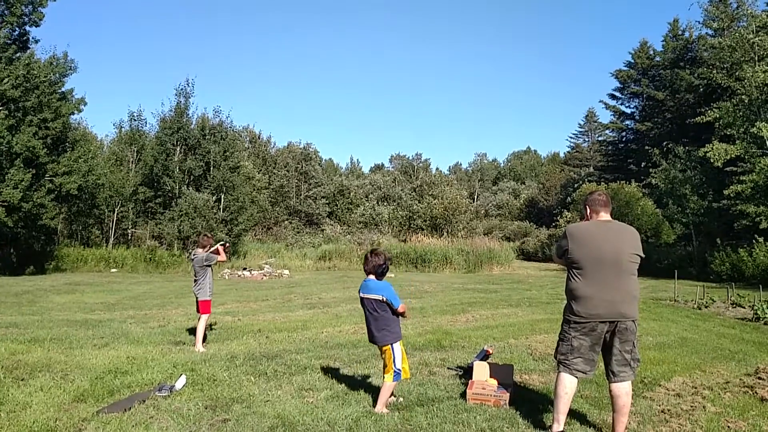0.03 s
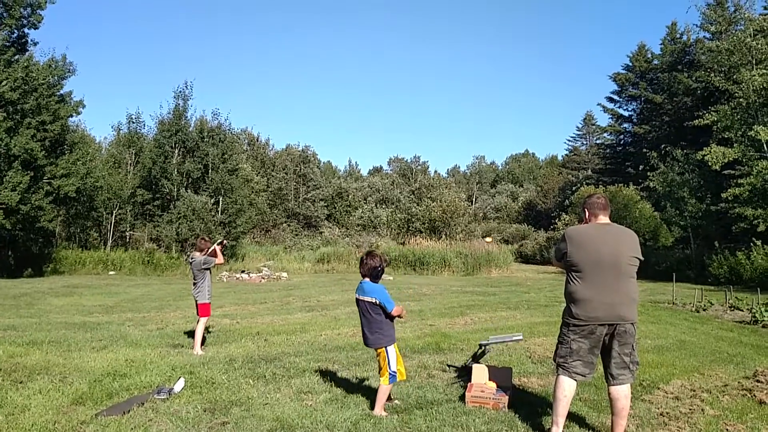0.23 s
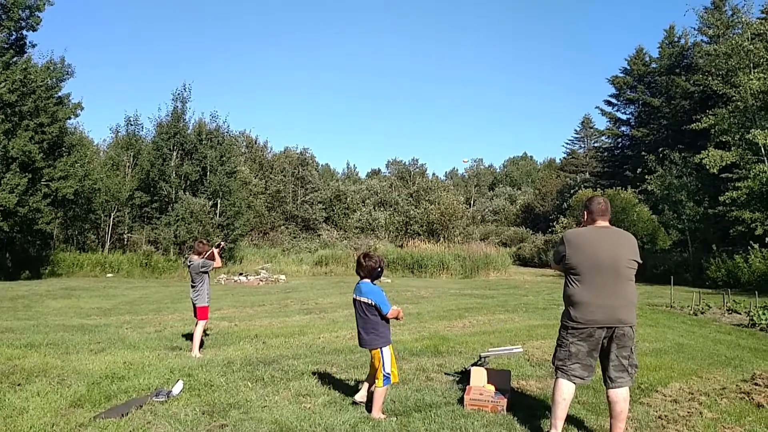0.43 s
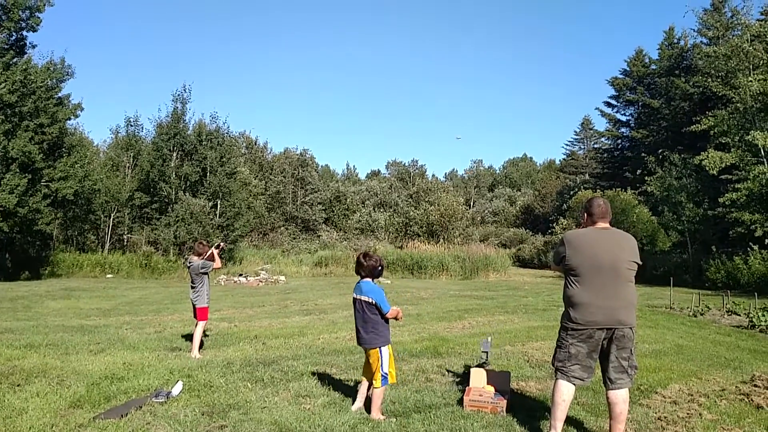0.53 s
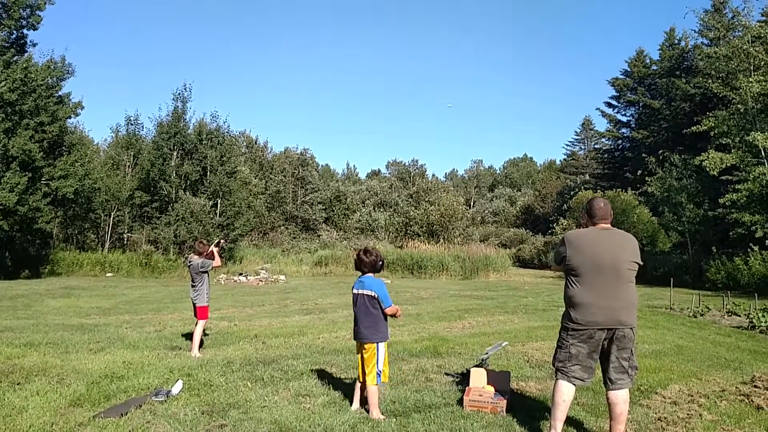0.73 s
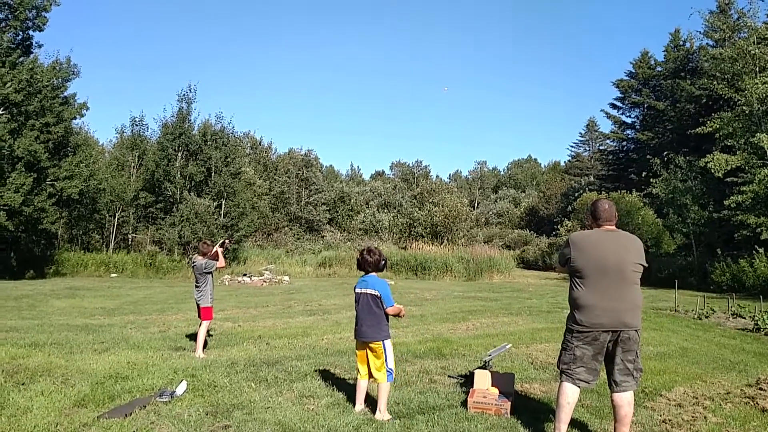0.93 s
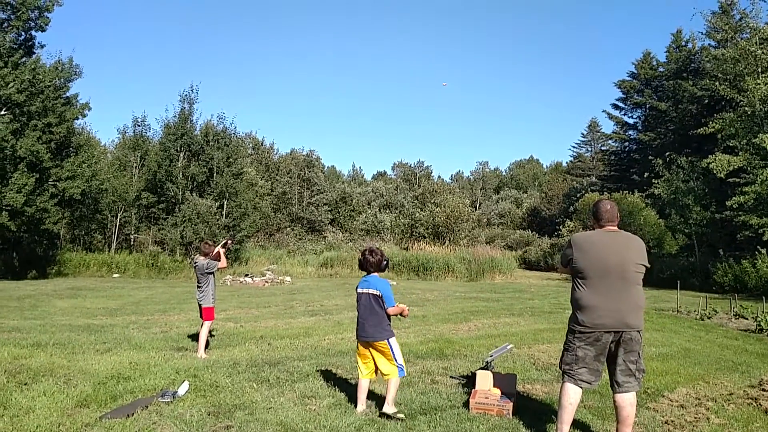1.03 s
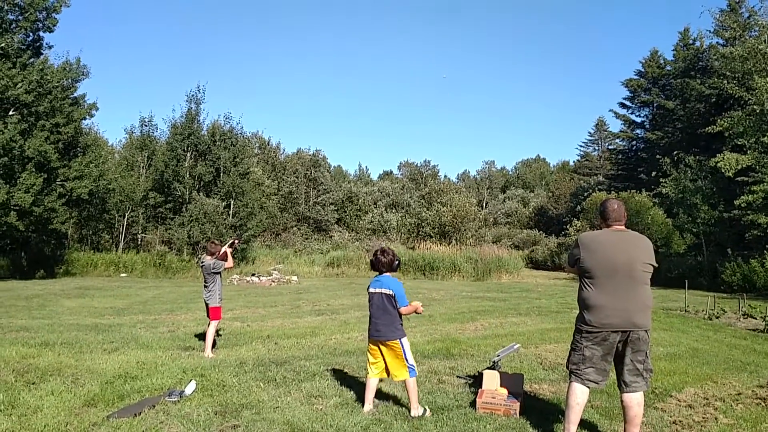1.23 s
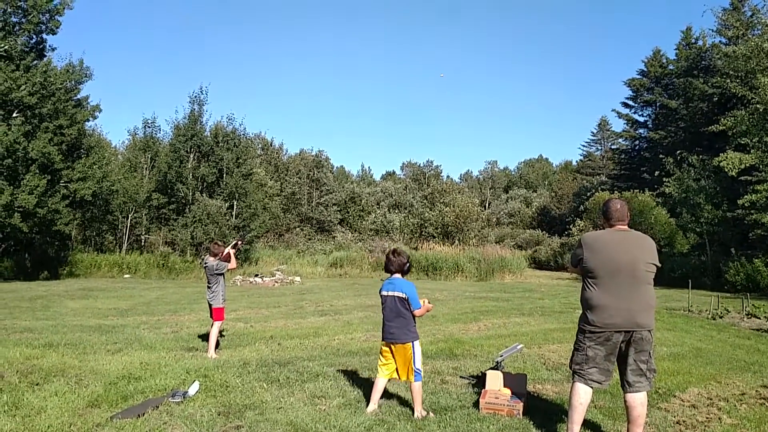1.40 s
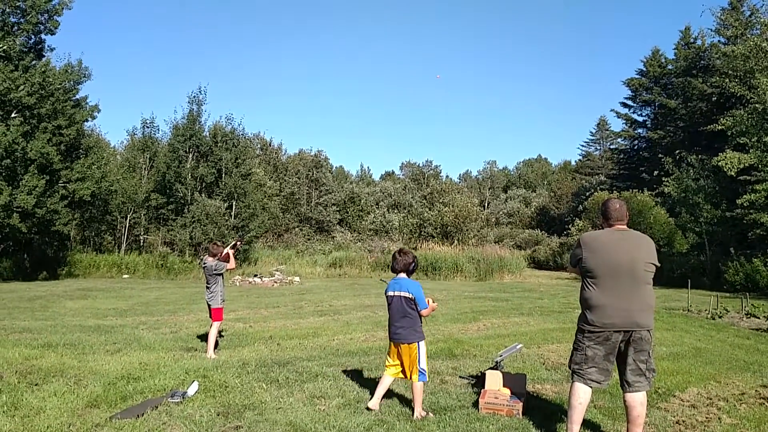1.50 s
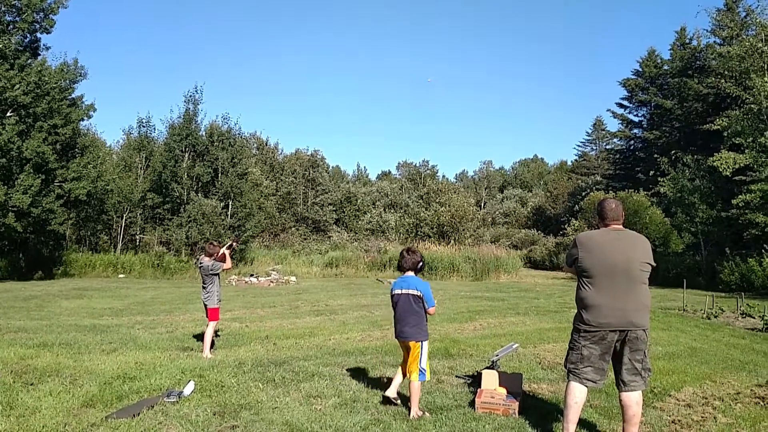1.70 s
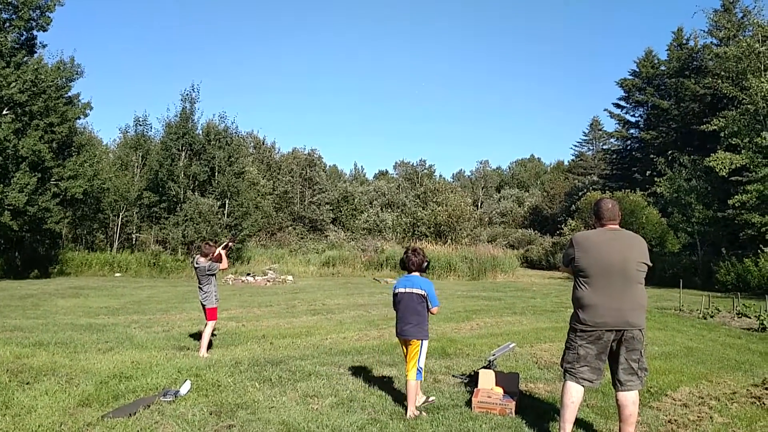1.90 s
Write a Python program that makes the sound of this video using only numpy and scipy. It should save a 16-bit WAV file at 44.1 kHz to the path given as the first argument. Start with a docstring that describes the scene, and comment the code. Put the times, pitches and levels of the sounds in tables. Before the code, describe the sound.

A clay target thrower's latch scrapes briefly at about 0.2 seconds and the steel arm immediately whips round with a sharp clack. The arm and spring rattle and ring, with a softer knock near 0.75 seconds and dull echoes from trees. The ring fades by about one second. Faint leaf hiss continues throughout, and light wind buffets the microphone, mostly from 1.2 to 1.7 seconds.

```python
"""A spring clay target thrower is released on a lawn. The latch slips, the steel arm whips round with a
clack, then swings, rattles and knocks once more while spring and frame ring on. Each blow is a noise
burst coloured by the frame and feeds decaying steel modes. Loose parts tick and the stand thuds.
Trees add dull echoes and a thin tail; a light breeze stirs the leaves and buffets the microphone."""
import sys
import numpy as np
from scipy import signal
from scipy.fft import rfft, irfft
from scipy.io import wavfile
from scipy.ndimage import uniform_filter1d

SR = 44100
rng = np.random.default_rng(int(sys.argv[2]) if len(sys.argv) > 2 else 0)


def master_out(mix):
    """Clip the mix to full scale and print it as 16-bit PCM to the path in sys.argv[1]."""
    frames = np.transpose(np.atleast_2d(mix))
    ceiling = np.clip(frames, -1, 1)
    pcm = np.round(ceiling * 32767).astype(np.int16)
    wavfile.write(sys.argv[1], SR, pcm)


N = 85995

# Leaf hiss spectrum. Each row: frequency in Hz, relative level in dB.
LEAF_SPECTRUM = [(25, -1.5), (60, -15.5), (115, -11.5), (175, -5.5), (235, -11.5), (320, -13.5),
                 (500, -15.5), (850, -16.5), (1600, -18), (2700, -25.5), (4200, -25), (5900, -35),
                 (10000, -41.5), (15500, -45.5)]
# Wind envelope. Each row: time in seconds, relative level in dB.
GUSTS = [(0,-51),(.12,-59),(0.5,-65.5),(.55,-73),(0.573,-41),(0.604,-63),(.64,-46),(.68,-53),(.86,-56),(1.01,-54.5),(1.038,-42),(1.065,-61),(1.155,-54),(1.19,-36.5),(1.206,-35.5),(1.231,-48.5),(1.282,-33.5),(1.305,-50.5),(1.328,-46),(1.398,-35),(1.49,-47),(1.556,-39),(1.64,-53.5),(1.67,-44.5),(1.704,-72),(1.754,-50.5),(1.86,-59),(1.95,-52)]
# Latch slips. Each row: start in seconds, scrape level in dB, click level in dB, decay in seconds.
LATCH_SLIPS = [(0.1697, -38.5, -72, 0.0068), (0.1808, -37.5, -42, 0.0086), (.188, -39.5, -68, 0.0086),
               (.198, -42, -58, 0.01)]
# Frame response. Each row: frequency in Hz, relative gain in dB.
FRAME_SPECTRUM = [(60, -45), (170, -26.5), (290, -23.5), (480, -24.5), (750, -8.5), (900, -8), (1080, 2),
                  (1250, -2), (1500, -5.5), (1850, -6), (2350, -7.5), (2900, -8), (3700, -13),
                  (4500, -10.5), (5300, -19.5), (6300, -22.5), (7300, -20.5), (10500, -29.5), (12400, -28),
                  (14000, -37), (16000, -56)]
# Arm blows. Each row: start in seconds, clank, clatter and tick levels in dB, chatter decay in seconds,
# contact pitch in Hz.
ARM_BLOWS = [(0.209, -44, -46.5, -71, 0.027, 1860), (0.2221, -35, -33.5, -47.5, 0.06, 2640),
             (.233, -47, -27, -41, 0.017, 2910), (0.2413, -17, -26, -33, 0.0024, 1130),
             (0.2435, -19.5, -30, -24.5, 0.0026, 1100), (0.2497, -31, -12.5, -27, 0.0029, 1060),
             (0.2529, -24.5, -22.5, -17.5, 0.0033, 3660), (0.262, -29, -28, -39, 0.015, 2070),
             (0.293, -28, -52, -42, 0.004, 3300), (0.299, -31.5, -38, -46, 0.0068, 1410),
             (0.333, -32, -61, -49.5, 0.024, 860), (0.428, -49, -52, -54.5, 0.0062, 1240),
             (0.4434, -47, -42.5, -51, 0.0065, 2130), (0.4814, -50.5, -41, -48.5, 0.011, 1780),
             (0.526, -39.5, -48, -49.5, 0.0093, 1723), (0.554, -36, -42, -44, 0.0025, 1140),
             (0.6104, -44.5, -47.5, -57, 0.0062, 1860), (0.644, -51.5, -62, -60.5, 0.014, 1473),
             (0.7464, -36.5, -37.5, -42, 0.0055, 1850), (.776, -45, -62, -55, 0.02, 4330),
             (1.05, -54, -63, -57, 0.0035, 1210)]
# Arm and spring modes. Each row: frequency in Hz, relative level in dB, T60 in seconds.
STEEL_MODES = [(858, -17, 1.12), (1008, 3, 0.051), (1104, -4, 0.18), (1311, -17, 0.58), (1377, -33, 0.38),
               (1743, -20, 0.14), (2130, -12, 0.12), (2610, -14.5, 0.47), (3277, -8.5, 0.14),
               (3510, -1, 0.068), (3830, -26, 0.27), (4020, -4.5, 0.022), (4420, -11, 0.12),
               (5230, -13, 0.14)]
# Low thuds. Each row: start in seconds, level in dB, band centre in Hz, decay in seconds.
LOW_THUDS = [(.245, -46, 280, 0.092), (0.748, -47.5, 177, 0.031), (1.078, -44.5, 246, 0.011)]
# Ticks of loose parts. Each row: start in seconds, level in dB.
PART_TICKS = [(0.291, -49), (0.306, -45.5), (0.321, -54), (0.474, -60), (0.534, -67), (0.603, -57.5),
              (0.741, -53), (0.775, -63)]
# Their spectrum. Each row: frequency in Hz, relative level in dB.
PART_SPECTRUM = [(1500, -25), (3500, 3.5), (6500, -4), (7350, 2), (9000, -17), (12200, -5), (16000, -35)]
# Dull echoes of the clack. Each row: start in seconds, level in dB, decay in seconds.
CLACK_ECHOES = [(0.3521, -29.5, 0.0079), (0.367, -38, 0.013), (.576, -44.5, 0.0028), (0.58, -44, 0.014),
                (0.764, -32.5, 0.0022), (.819, -59.5, 0.023)]

CLANK_TOP_HZ, CLATTER_TOP_HZ = 1526, 3110  # the tick band lies above both


def amp(db):
    """Decibels to gain."""
    return 10 ** (np.asarray(db) / 20)


def unit_rms(x):
    """Scales to rms 1."""
    return x / np.sqrt(np.mean(x ** 2) + 1e-20)


def flatten(x, window_s):
    """Holds the running rms at 1."""
    return x / np.sqrt(uniform_filter1d(x ** 2, round(window_s * SR)) + 1e-12)


def at_level(burst, db, decay_s):
    """Gives a burst the energy of decay_s seconds at level db."""
    return amp(db) * burst / np.linalg.norm(burst) * np.sqrt(decay_s * SR)


def fade(t, t60_s):
    """Decay of 60 dB per t60_s."""
    return np.exp(-np.log(1000) * t / t60_s)


def spectrum_db(points, hz):
    """Interpolates a spectrum over log frequency."""
    f, db = np.transpose(points)
    return np.interp(np.log(hz + 1), np.log(f + 1), db)


def add(mix, start_s, sound):
    """Mixes a sound in at start_s."""
    part = mix[round(start_s * SR):][:len(sound)]
    part += sound[:len(part)]


def below(hz, edge_hz, order):
    """Low-pass gain; high-pass with the frequencies swapped."""
    return 1 / np.sqrt(1 + (hz / edge_hz) ** order)


def band(hz, centre_hz, half_width_oct, order=4):
    """Band-pass gain."""
    return below(abs(np.log2((hz + 1) / centre_hz)), half_width_oct, order)


def causal_taps(gain):
    """Minimum-phase filter for gain(hz)."""
    hz = abs(np.fft.fftfreq(4096, 1 / SR))
    log_gain = np.log(np.maximum(gain(hz), 1e-5))
    taps = np.fft.ifft(np.exp(np.conj(signal.hilbert(log_gain)))).real
    return taps[:len(taps) // 2]


def colour(x, gain):
    """Filters by gain(hz)."""
    return signal.oaconvolve(x, causal_taps(gain))[:len(x)]


def frame_gain(hz, peak_db=5.5, relative_width=0.012):
    """Broad frame response with a peak at each steel mode."""
    peaks = sum(1 / (1 + ((hz / mode[0] - 1) / relative_width) ** 2) for mode in STEEL_MODES)
    return amp(spectrum_db(FRAME_SPECTRUM, hz) + peak_db * peaks)


def leaves(level_db=-54.5):
    """Steady hiss of distant leaves."""
    gain = amp(spectrum_db(LEAF_SPECTRUM, np.fft.rfftfreq(N, 1 / SR)))
    hiss = irfft(rfft(rng.standard_normal(N)) * gain, N)
    return amp(level_db) * unit_rms(hiss)


def wind(low_hz=27.4, calm_knee_hz=78, hz_per_db=5.5, calm_db=-52.5, gain_db=-0.5):
    """Low eddies at the microphone; stronger gusts reach higher."""
    hz, t, bins = signal.stft(rng.standard_normal(N), SR, nperseg=2048)
    times_s, gust_db = np.transpose(GUSTS)
    knee_hz = calm_knee_hz + hz_per_db * np.maximum(np.interp(t, times_s, gust_db) - calm_db, 0)
    bins = bins * below(hz[:, None], knee_hz, order=9) * below(low_hz, hz[:, None] + 1, order=4)
    eddies = flatten(signal.istft(bins, SR, nperseg=2048)[1][:N], window_s=0.0384)
    return eddies * amp(gain_db + np.interp(np.arange(N) / SR, times_s, gust_db))


def latch(scrape_hz=1880):
    """The catch scrapes in one narrow band and clicks against the frame."""
    out, t = np.zeros(N), np.arange(SR // 10) / SR
    for start_s, scrape_db, click_db, decay_s in LATCH_SLIPS:
        slip = rng.standard_normal(len(t)) * np.exp(-t / decay_s)
        scrape = colour(slip, lambda f: band(f, scrape_hz, half_width_oct=0.12))
        click = colour(slip, lambda f: frame_gain(f) ** 1.43)
        add(out, start_s, at_level(scrape, scrape_db, decay_s) + at_level(click, click_db, decay_s))
    return out


def arm_blows(crack_s=0.0014, grain_s=0.00078, grain_db=3.5, contact_db=8.5, body_share=0.58):
    """Each blow is a crack and a burst of metal chatter that shakes the frame."""
    out, t = np.zeros(N), np.arange(SR // 10) / SR
    bands = [lambda f: below(f, CLANK_TOP_HZ, order=12),
             lambda f: below(f, CLATTER_TOP_HZ, order=12) * below(CLANK_TOP_HZ, f + 1, order=12),
             lambda f: below(CLATTER_TOP_HZ, f + 1, order=12)]
    band_taps = np.array([causal_taps(lambda f: gain(f) * frame_gain(f)) for gain in bands])
    for start_s, *levels_db, decay_s, contact_hz in ARM_BLOWS:
        noise, rough, body = rng.standard_normal((3, len(t)))
        body = body * fade(t, t60_s=0.026)  # dense short frame resonances
        body *= body_share / np.linalg.norm(body)
        body[0] += 1 - body_share  # direct path
        grains = amp(grain_db * unit_rms(uniform_filter1d(rough, round(grain_s * SR))))
        chatter = noise * grains * (np.exp(-t / decay_s) + 0.17 * np.exp(-t / crack_s))
        chatter = colour(chatter, lambda f: amp(contact_db * band(f, contact_hz, half_width_oct=0.11)))
        shake = signal.fftconvolve(chatter, body)[:len(t)]
        for db, taps in zip(levels_db, band_taps):
            add(out, start_s, at_level(signal.fftconvolve(shake, taps), db, decay_s))
    return out


def steel_ring(gain_db=-4.5, rise_s=0.0028, swing_hz=10.4, swing_top_s=0.352, settle_s=0.042,
               max_bend=0.0193, full_bend_hz=2500, throb_depth_db=5.5, throb_top_s=0.3376, hard_db=-17):
    """Blows feed the modes of arm and spring; the swinging arm bends their pitch and makes them throb."""
    out, t = np.zeros(N), np.arange(N) / SR
    blows, control_s = np.array(ARM_BLOWS), t[::20]
    age_s = control_s[:, None] - blows[:, 0]
    swing_s = control_s - swing_top_s
    swing = np.cos(2 * np.pi * swing_hz * swing_s) * np.exp(-np.maximum(swing_s, 0) / settle_s)
    throb_db = throb_depth_db * np.cos(2 * np.pi * swing_hz * (control_s - throb_top_s))
    for hz, db, t60_s in STEEL_MODES:
        blow_db = blows[:, 1 + int(hz > CLANK_TOP_HZ) + int(hz > CLATTER_TOP_HZ)]
        force = amp(hard_db + 1.53 * (blow_db - hard_db))  # hard blows ring disproportionately
        rings = force * np.clip(age_s / rise_s, 0, 1) * fade(np.maximum(age_s, 0), t60_s)
        level = np.linalg.norm(rings, axis=1) * amp(gain_db + db + throb_db)
        bend = max_bend * min(hz / full_bend_hz, 1) ** 2
        cycles = np.cumsum(np.interp(t, control_s, hz * (1 + bend * swing))) / SR
        out += np.interp(t, control_s, level) * np.sin(2 * np.pi * (cycles + rng.random()))
    return out


def trees(x, gain_db=-14, rise_s=0.027, cutoff_hz=2270):
    """Far trees scatter back a thin, dull tail."""
    t = np.arange(SR) / SR
    tail = rng.standard_normal(SR) * fade(t, t60_s=1) * np.minimum(t / rise_s, 1)
    scatter = signal.fftconvolve(x, tail / np.linalg.norm(tail))[:N]
    return amp(gain_db) * colour(scatter, lambda f: below(f, cutoff_hz, order=2))


def thuds(rise_s=0.0089):
    """Low noise swells: the stand under two hard blows, later a thud on the grass."""
    out, t = np.zeros(N), np.arange(SR // 2) / SR
    for start_s, db, hz, decay_s in LOW_THUDS:
        rumble = colour(rng.standard_normal(SR), lambda f: band(f, hz, half_width_oct=0.23))[-len(t):]
        envelope = np.minimum(t / rise_s, 1) * np.exp(-np.maximum(t - rise_s, 0) / decay_s)
        add(out, start_s, amp(db) * flatten(rumble, window_s=0.012) * envelope)
    return out


def loose_parts(decay_s=0.0076):
    """Small loose parts touch with thin, bright ticks."""
    out, t = np.zeros(N), np.arange(SR // 10) / SR
    for start_s, db in PART_TICKS:
        touch = rng.standard_normal(len(t)) * np.exp(-t / decay_s)
        tick = colour(touch, lambda f: amp(spectrum_db(PART_SPECTRUM, f)))
        add(out, start_s, at_level(tick, db, decay_s))
    return out


def clack_echoes(centre_hz=1126):
    """Dull echoes of the clack from the trees: short, soft knocks of band-passed noise."""
    out, t = np.zeros(N), np.arange(SR // 10) / SR
    for start_s, db, decay_s in CLACK_ECHOES:
        burst = rng.standard_normal(len(t)) * np.exp(-t / decay_s)
        echo = colour(burst, lambda f: band(f, centre_hz, half_width_oct=0.18, order=6))
        add(out, start_s, at_level(echo, db, decay_s))
    return out


def scene():
    """Thrower, tree echoes and tail, and breeze in mono."""
    launch = latch() + arm_blows() + loose_parts() + clack_echoes() + steel_ring()
    return (launch + trees(launch) + leaves() + wind() + thuds())[None]


def record(dry):
    """Steep treble cut."""
    cutoff_hz = 15700
    taps = signal.firwin(511, cutoff_hz, window=("kaiser", 9), fs=SR)
    return signal.oaconvolve(dry, taps[None], "same")


dry = scene()
out = record(dry)
master_out(out)
```